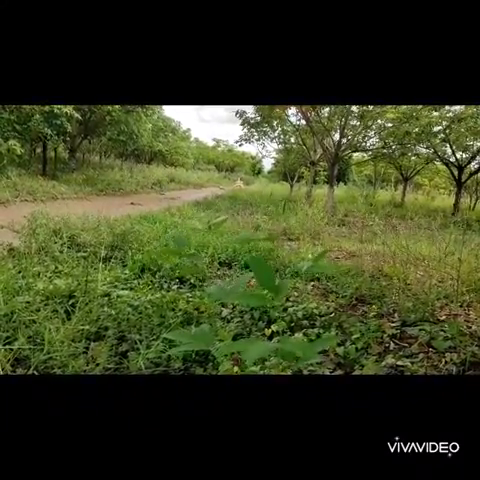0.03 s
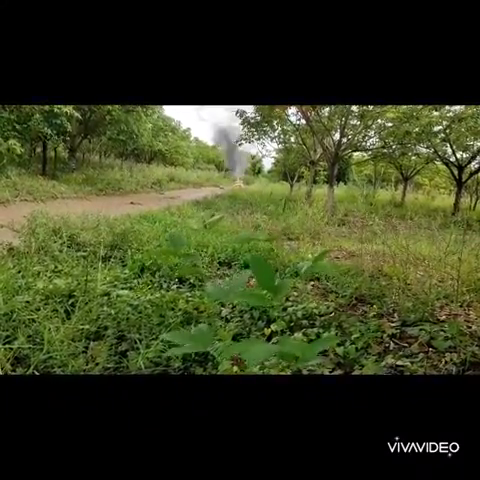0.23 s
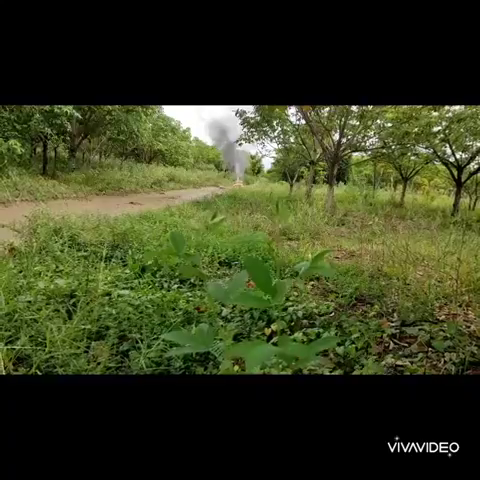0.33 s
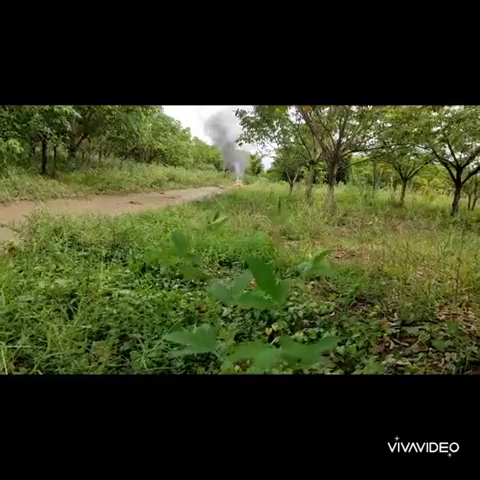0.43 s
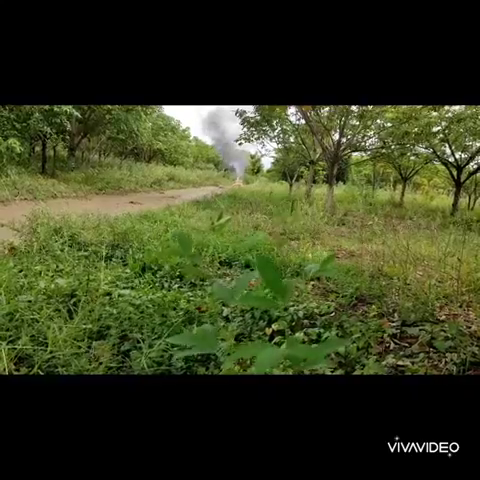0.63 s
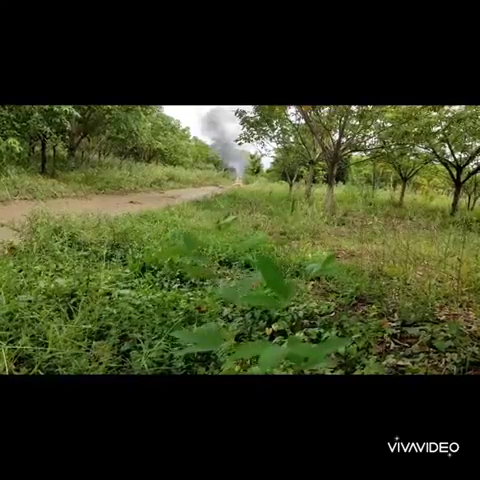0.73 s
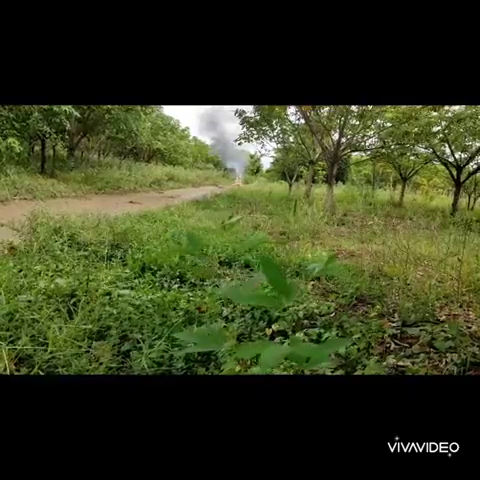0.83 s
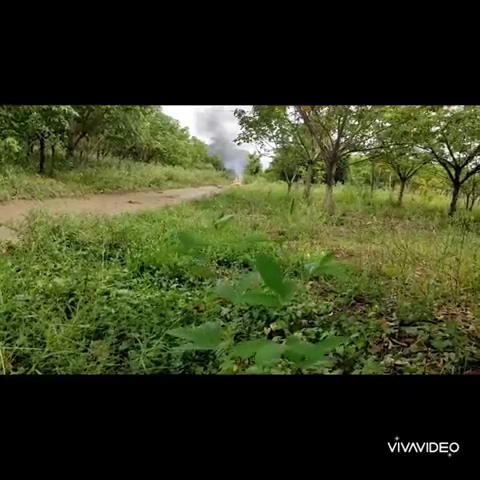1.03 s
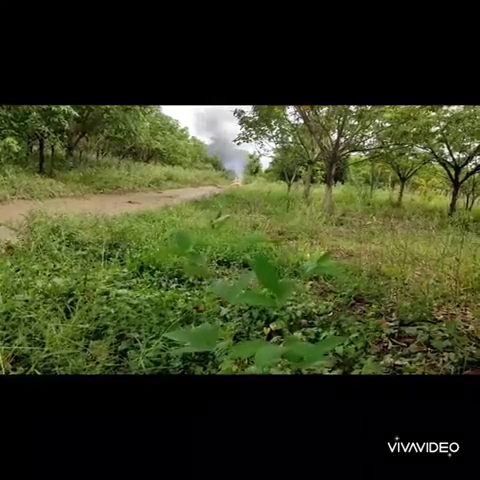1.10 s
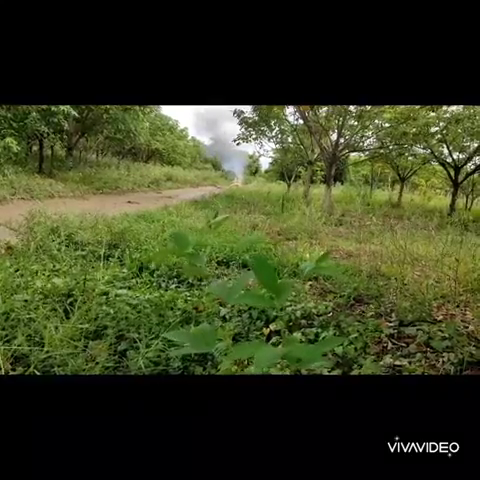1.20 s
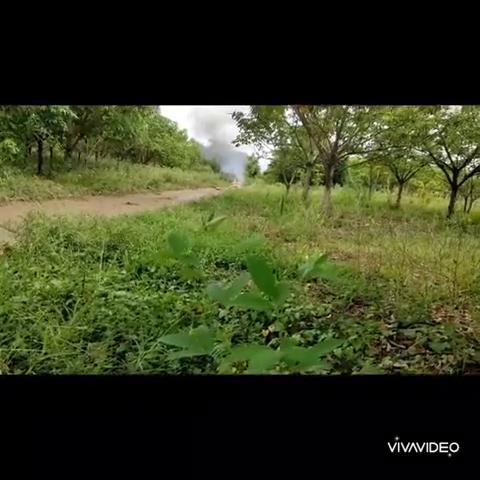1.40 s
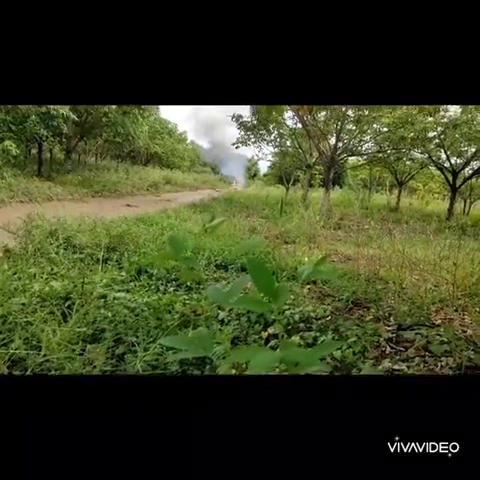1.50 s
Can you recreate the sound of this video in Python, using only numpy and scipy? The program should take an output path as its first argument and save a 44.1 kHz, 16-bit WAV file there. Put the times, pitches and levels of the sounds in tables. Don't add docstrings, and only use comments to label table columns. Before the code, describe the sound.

After a brief near-silence with a thin insect song, a distant detonation snaps and booms in quick succession; trees and slopes return a bright roar, then uneven low rumbling, heard outdoors on a slightly overloaded, dull-topped microphone.

```python
import sys
import numpy as np
from scipy import signal
from scipy.fft import rfft, irfft
from scipy.io import wavfile
from scipy.ndimage import uniform_filter1d

SR = 44100
rng = np.random.default_rng(int(sys.argv[2]) if len(sys.argv) > 2 else 0)


def pcm_store(signal):
    levels = np.round(np.clip(np.atleast_2d(signal), -1, 1) * 32767)
    wavfile.write(sys.argv[1], SR, levels.astype(np.int16).T)


def volts_from_db(level):
    exponent = np.asarray(level, float) / 20
    return 10 ** exponent


N = 68355
FIRST_S, BLAST_S = .2383, .3087
EARLY_S = .240

# start_s, level_db [dB], left_right_db [dB]
RUMBLE_CURVE = [(0.325, -12, -2), (0.351, -27.5, 3), (0.5, -23.5, 3), (0.647, -24, 7), (0.699, -24, 1),
                (0.82, -25.5, 0.5), (0.947, -29, -0.5), (1.027, -26.5, 0), (1.169, -32, 2.5),
                (1.259, -30.5, 0.5), (1.343, -38, 2.5), (1.45, -37, 1.5), (1.55, -34, 0)]


def shocks():
    direct = shock_fronts() + ground_rings() + crackle()
    return signal.lfilter(*signal.iirnotch(1500, 12, SR), direct)


def shock_fronts():
    # start_s, peak_db [dB], length_s, left_right_db [dB]
    fronts = [
        (.2383, -11, .0008, 0),
        (.2391, -4, .0011, 1),
        (.2404, -9, .0014, 4),
        (.2419, -10, .0046, 4),
        (.2478, -18, .0038, 6),
        (.2530, -23, .004, 6),
        (.3087, -6, .0032, 3),
        (.3120, -8, .0032, 1),
        (.3154, -3, .0028, 3),
        (.3190, -10, .0050, 2),
    ]
    out = 0
    for start_s, peak_db, length_s, side_db in fronts:
        phase = (clock() - start_s) / length_s
        n_wave = (1 - 2 * phase) * (phase >= 0) * (phase < 1)
        out = out + pan(side_db) * volts_from_db(peak_db) * n_wave
    return low_pass(out, 4800)


def ground_rings():
    # pitch_hz, peak_db [dB], t60_s
    first_modes = [(197.8, -19, 0.17), (556, -37, 0.04), (638, -22.5, 0.099), (1100, -28, 0.18)]
    # pitch_hz, peak_db [dB], t60_s
    blast_modes = [(94, -15.5, 0.12), (280, -54, 0.08), (600, -10.5, 0.046)]
    out = 0
    for start_s, modes in ((FIRST_S, first_modes), (BLAST_S, blast_modes)):
        click = np.arange(N) == int(start_s * SR)
        for hz, peak_db, t60_s in modes:
            out = out + volts_from_db(peak_db) * ring(click, hz, t60_s)
    return pan(11.0) * out


def crackle():
    # level_db [dB rms], t60_s, left_right_db [dB], dull_above_hz
    bursts = [
        (-7, 0.025, 0.5, 12000),
        (-11, 0.045, -3, 21000),
    ]
    # pitch_hz, density_db [dB per Hz]
    colour = [(700, 6), (1100, -1), (1500, 0), (2200, -3), (4300, 1), (6500, 1), (9000, -5), (15000, -3)]
    forerun_s, forerun_db = 0.0052, -30
    grit = bands(colour, patchy_db=2.0)
    out = 0
    for start_s, (level_db, t60_s, side_db, dull_hz) in zip((FIRST_S, BLAST_S), bursts):
        envelope = volts_from_db(level_db) * dying(start_s, t60_s, rise=0.0009)
        envelope = envelope + volts_from_db(forerun_db) * dying(start_s - forerun_s, t60_s, forerun_s)
        out = out + pan(side_db) * envelope * low_pass(grit, dull_hz)
    return out


def scatter():
    after_blast = dying(.309, 1e6, rise=.010)
    return early_scatter() + after_blast * (roar() + rumble() + thuds())


def early_scatter():
    # pitch_hz, density_db [dB per Hz]
    wash_colour = [(60, -7), (220, -9), (500, -15.5), (1300, -20.5), (2300, -8.5), (3800, -13.5),
                   (5200, -32), (15000, -62)]
    # pitch_hz, density_db [dB per Hz]
    hiss_colour = [(3200, -9), (4000, -2), (5000, -4), (6300, 0), (7500, 0), (9000, -10), (14000, -24)]
    dips_hz = (2960, 4780, 5600)
    wash = volts_from_db(-16.5) * dying(EARLY_S, 0.19, rise=0.00074) * pan(0.99) * bands(wash_colour, patchy_db=3.0)
    hanging = dying(EARLY_S, 1e6, rise=.014) - dying(.299, 1e6, rise=.003)
    out = wash + volts_from_db(-34) * hanging * bands(hiss_colour, patchy_db=1.0)
    for hz in dips_hz:
        out = signal.lfilter(*signal.iirnotch(hz, 9, SR), out)
    return out


def roar():
    # start_s, level_db [dB], left_right_db [dB]
    course = [
        (.325, -17, -1.5),
        (.395, -18, -2.5),
        (.5, -19, -1.5),
        (.635, -21.5, 0.5),
        (.719, -25, -4),
        (.873, -37.5, -5),
        (1.0, -44, -4.5),
        (1.255, -55, -5),
        (1.55, -59, -4),
    ]
    # pitch_hz, density_db [dB per Hz]
    colour = [(400, -10.5), (800, -17.5), (1400, -10), (2200, -1.5), (4000, -6), (7000, -12.5),
              (10000, -18), (15000, -39)]
    # pitch_hz, loss_db_per_s [dB per s]
    air_loss = [(400, -24.5), (1000, -23.5), (2500, -6), (5500, 3), (9000, 15), (14000, 45)]
    level_db, side_db = in_time(course)
    return volts_from_db(level_db) * pan(side_db) * bands(colour, 1.78, air_loss, path_time())


def rumble():
    # pitch_hz, density_db [dB per Hz]
    colour = [(20, -32), (50, -4.5), (90, -2), (160, 0), (290, -0.5), (400, -18.5), (580, -5.5), (900, -26)]
    # pitch_hz, loss_db_per_s [dB per s]
    loss = [(30, -10.5), (100, -6), (200, 0.5), (300, 6), (600, 24.5)]
    level_db, side_db = in_time(RUMBLE_CURVE)
    swell = volts_from_db(level_db) * dying(.309, 1e6, rise=0.074)
    return swell * pan(side_db) * bands(colour, 1.4, loss, path_time())


def thuds():
    # centre_s, peak_db [dB], pitch_hz, length_cycles
    pushes = [(.334, -12.5, 200, 1.36), (0.378, -30, 130, 2.1), (0.43, -16, 280, 2.1),
              (.443, -11, 200, 1.24), (0.501, -19.5, 134, 3.2), (0.521, -12.5, 230, 1),
              (0.544, -19.5, 270, 0.98), (0.586, -12.5, 260, 1.9), (0.609, -13, 200, 1.2),
              (0.631, -12, 230, 1.35), (.699, -11.5, 190, 1.5), (.710, -13.5, 110, 1.8),
              (.761, -16.5, 240, 2.3), (0.837, -18.5, 260, 0.79), (0.917, -23.5, 200, 1.05),
              (0.929, -26, 170, 5.4), (1.062, -18.5, 150, 1.3), (1.124, -19, 200, 1.43),
              (1.164, -25.5, 105, 3.6), (1.199, -18, 160, 2.3), (1.212, -22, 200, 1.1),
              (1.321, -21, 90, 1.05), (1.375, -25, 100, 0.65), (1.416, -23.5, 150, 1.26)]
    # centre_s, peak_db [dB], pitch_hz, length_cycles
    pulls = [(0.371, -11.5, 170, 0.88), (.467, -16, 230, 0.92), (.485, -20.5, 280, 3.4),
             (0.506, -20.5, 260, 2.3), (.569, -14, 200, 0.84), (.645, -10, 210, 1.08),
             (.682, -23, 240, 2.4), (0.73, -15, 220, 1.8), (.746, -22, 280, 1.8), (0.779, -18, 283, 1.94),
             (0.796, -18, 150, 2.7), (0.824, -18.5, 130, 1.04), (0.867, -26, 150, 1.3),
             (0.99, -20, 250, 1.4), (1.015, -21, 110, 1.3), (1.026, -18.5, 150, 1.5),
             (1.036, -22.5, 150, 1.7), (1.050, -14.5, 150, 0.83), (1.097, -20.5, 100, 2.5),
             (1.151, -22.5, 110, 1.9), (1.224, -24, 110, 2.4), (1.294, -20, 95, 2.2)]
    # centre_s, peak_db [dB], pitch_hz, length_cycles
    knocks = [(.427, -36, 540, 3.3), (.471, -38, 480, 2.3), (.492, -24, 515, 4.5), (.519, -19.5, 600, 2.6),
              (.564, -27, 576, 2.4), (.583, -19, 490, 1.9), (.601, -23.5, 550, 5.7),
              (.644, -25.5, 480, 1.8), (.674, -24, 570, 5), (.702, -26, 500, 6.2), (.747, -29, 573, 7.4),
              (.840, -32, 553, 7.7)]
    out = 0
    for polarity, echoes in ((1, pushes), (1, knocks), (-1, pulls)):
        for centre_s, peak_db, hz, cycles in echoes:
            out = out + polarity * packet(centre_s, peak_db, hz, cycles / hz)
    _, side_db = in_time(RUMBLE_CURVE)
    return out * pan(side_db)


def insect():
    # start_s, level_db [dB]
    song = [
        (0, -59),
        (.035, -56),
        (.058, -48),
        (.07, -56),
        (.088, -52),
        (.12, -59),
        (.16, -62),
        (.2, -68),
        (.23, -74),
    ]
    # pitch_hz, level_db [dB], width_hz
    lines = [
        (2740, 0, 40),
        (2820, -1, 50),
        (2680, -8, 60),
    ]
    level_db, = in_time(song)
    whine = 0
    for hz, line_db, width_hz in lines:
        t60_s = 1.8 / width_hz
        once = ring(rng.standard_normal(N), hz, t60_s)
        whine = whine + volts_from_db(line_db) * rms_one(ring(once, hz, t60_s))
    return volts_from_db(level_db - 4.5) * whine * pan(-4)


def chirps():
    # centre_s, peak_db [dB], pitch_hz, length_s
    calls = [(.008, -73, 4270, .025), (.02, -70, 1150, .04), (.032, -62, 400, .008), (.12, -66, 1156, .03),
             (.200, -54, 450, .003), (.202, -64, 1500, .004), (.214, -65, 1150, .035),
             (.998, -43, 980, .025), (1.307, -52, 2400, .005), (1.336, -48, 1950, .008),
             (1.336, -53, 3750, .006), (1.365, -42, 2000, .011), (1.366, -52, 2950, .008),
             (1.367, -53, 3760, .009), (1.538, -46, 3550, .008), (1.538, -51, 1950, .006)]
    return sum(packet(*call) for call in calls) * (1 + 0.25 * drift(160)) * pan(-6.5)


def still_air():
    # pitch_hz, density_db [dB per Hz]
    colour = [(20, 15), (80, 3.5), (300, -7.5), (1000, -16), (2500, -15), (6000, -16.5), (9000, -19.5),
              (15000, -26)]
    return volts_from_db(-56.5) * bands(colour, patchy_db=2.0)


def bands(spectrum, patchy_db, loss=None, path_s=0):
    # pitch_hz, left_right_likeness [0 to 1]
    likeness = [(60, 0.36), (180, 0.9), (540, 0.82), (1620, 0.051), (4850, 0.098), (14500, 0.42)]
    out, weight, together = 0, 0, drift(3.7)
    lowest_hz, highest_hz = spectrum[0][0], spectrum[-1][0]
    edges = lowest_hz * 2 ** np.arange(-1 / 3, np.log2(highest_hz / lowest_hz) + .2, 1 / 3)
    white = rng.standard_normal((2, 2, N + SR // 4))
    for k, (low, high) in enumerate(zip(edges, edges[1:])):
        band_filter = signal.butter(2, [low, high], "band", fs=SR, output="sos")
        mid, side = signal.sosfilt(band_filter, white[k % 2])[:, -N:]
        hz = np.sqrt(low * high)
        alike = np.clip(at_hz(likeness, hz), 0, 1)
        density_db = at_hz(spectrum, hz)
        fade_db = at_hz(loss, hz) * path_s if loss else 0
        flicker_db = patchy_db * (0.59 * together + drift(23))
        stereo = np.sqrt(1 + alike) * mid + np.sqrt(1 - alike) * side * [[1], [-1]]
        out = out + volts_from_db(density_db - fade_db + flicker_db) * stereo
        weight += volts_from_db(density_db) ** 2 * (high - low) * 4 / SR
    return out / np.sqrt(weight)


def ring(x, hz, t60):
    r, w = volts_from_db(-60 / (t60 * SR)), 2 * np.pi * hz / SR
    return signal.lfilter([0, np.sin(w)], [1, -2 * r * np.cos(w), r * r], x + 1e-18)


def packet(centre, db, hz, length):
    age = clock() - centre
    return volts_from_db(db) * np.cos(2 * np.pi * hz * age) * np.exp(-(2 * age / length) ** 2)


def dying(start, t60, rise):
    age = np.maximum(clock() - start, 0)
    return np.minimum(age / rise, 1) * volts_from_db(-60 * age / t60)


def drift(rate):
    r = np.exp(-80 * np.pi * rate / SR)
    noise = rng.standard_normal(N // 40 + 2002)
    slow = signal.lfilter([1], [1, -2 * r, r * r], noise)[2000:]
    return np.interp(np.arange(N) / 40, np.arange(len(slow)), rms_one(slow))


def path_time():
    return np.clip(clock() - .43, -.1, .85)


def low_pass(x, hz):
    return signal.sosfilt(signal.butter(2, hz, fs=SR, output="sos"), x)


def pan(db):
    return volts_from_db(np.array([db, -db]) / 2).reshape(2, -1)


def in_time(rows):
    s, *columns = np.transpose(rows)
    return [np.interp(clock(), s, c) for c in columns]


def at_hz(points, hz):
    table_hz, values = np.array(points).T
    return np.interp(np.log(hz), np.log(table_hz), values)


def rms_one(x):
    return x / np.sqrt(np.mean(x ** 2) + 1e-20)


def clock():
    return np.arange(N) / SR


def scene():
    return shocks() + scatter() + insect() + chirps() + still_air()


def roll_off(x):
    return signal.sosfilt(signal.butter(12, 15140, fs=SR, output="sos"), x)


def record(dry):
    x = signal.sosfilt(signal.butter(2, 58, "high", fs=SR, output="sos"), dry)
    ceiling = .95
    x = ceiling * np.tanh(x / ceiling)
    hz = np.fft.rfftfreq(N, 1 / SR)
    gap_low_hz, gap_high_hz = 7550, 8280
    steps_db = np.select([hz < 7005, hz < gap_low_hz, hz < gap_high_hz, hz < 10250, hz < 14550],
                         [0, -9, -11, -10, -12.5], -60)
    spectrum = rfft(x) * volts_from_db(uniform_filter1d(steps_db * 1., size=200))
    in_gap = 1. * (hz > gap_low_hz) * (hz < gap_high_hz)
    gap = irfft(spectrum * uniform_filter1d(in_gap, size=60), N)
    shut = dying(.338, 1e6, rise=.004) - dying(.735, 1e6, rise=.01) + dying(.815, 1e6, rise=.01)
    mix = irfft(spectrum, N) - (1 - volts_from_db(-30)) * shut * gap
    return roll_off(mix)


dry = scene()
out = record(dry)
pcm_store(out)
```